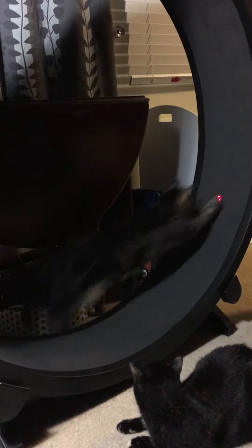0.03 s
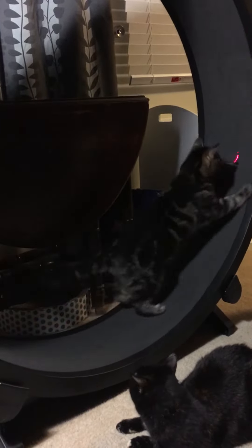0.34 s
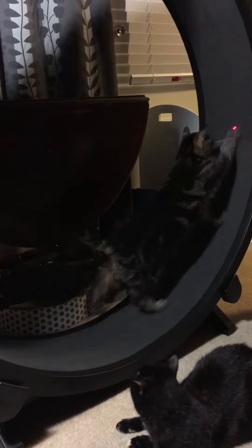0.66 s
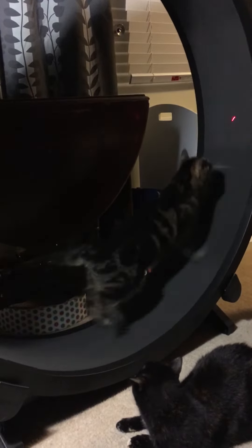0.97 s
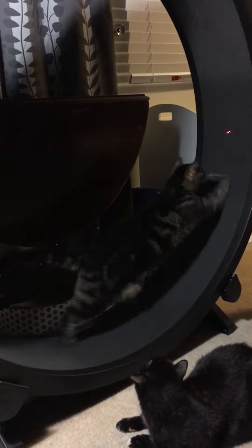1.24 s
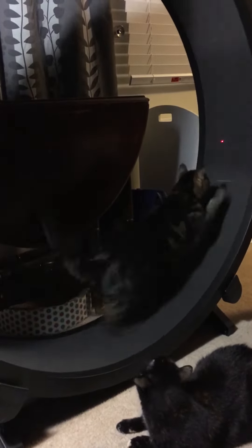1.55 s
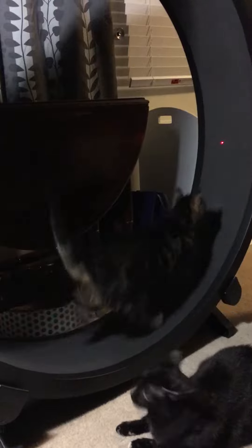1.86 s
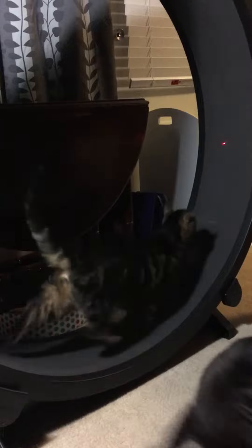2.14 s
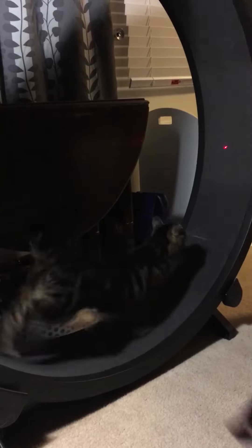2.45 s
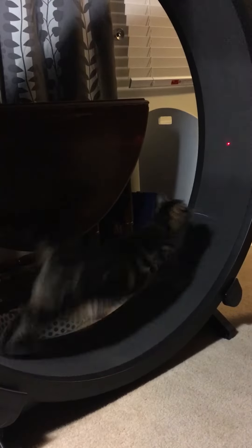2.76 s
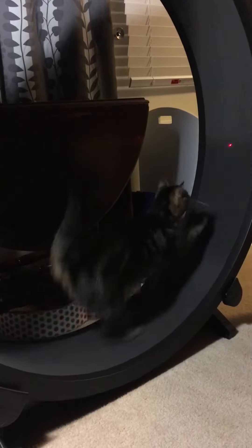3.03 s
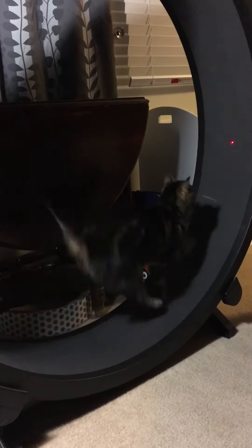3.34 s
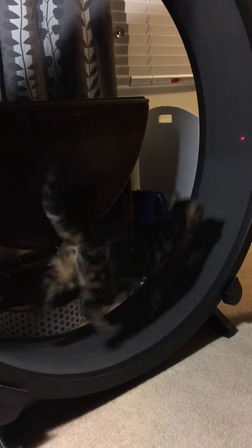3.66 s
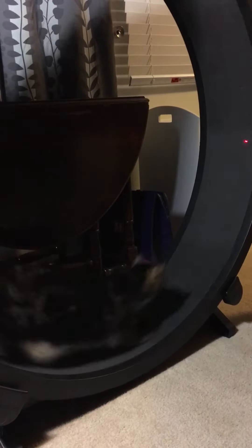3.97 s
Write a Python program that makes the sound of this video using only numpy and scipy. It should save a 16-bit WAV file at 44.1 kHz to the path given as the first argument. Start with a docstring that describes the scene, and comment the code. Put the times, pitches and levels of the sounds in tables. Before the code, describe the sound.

Hollow paw thumps and claw ticks as a cat runs in a rumbling exercise wheel.

```python
"""Paw thumps, sparse at first, then a steady gallop: a cat in a large plastic exercise wheel.
Each paw swells the wheel's hollow ring into a thump. The rim clacks on its rollers; claws tick,
squeak and snag in the tread. Underneath, the rollers rumble as the wheel gathers speed and paws
scuff the lining. The room is quiet and carpeted."""
import sys
import numpy as np
from scipy import signal
from scipy.io import wavfile
from scipy.ndimage import map_coordinates

SR = 44100
rng = np.random.default_rng(int(sys.argv[2]) if len(sys.argv) > 2 else 0)


def digitize_waveform(pressure):
    """Quantize a signal to 16-bit integers and store it at the path in sys.argv[1].

    Rows of a 2-D input are taken as channels; values are limited to [-1, 1].
    """
    field = np.atleast_2d(pressure).T
    bounded = np.clip(field, -1, 1)
    quanta = np.round(bounded * 32767).astype(np.int16)
    wavfile.write(sys.argv[1], SR, quanta)


N = 176400
T = np.arange(N) / SR

# room air spectrum: f/Hz, level/dB
AIR_SPECTRUM = [(25,-32),(60,3),(180,-1.5),(450,-11.5),(1600,-19.5),(16000,-41.5)]
# room decay: f/Hz, t60/s
ROOM_DECAY = [(100,0.71),(500,0.2),(2000,0.18),(8000,0.17),(16000,0.12)]
# rolling envelope: t/s, level/dB
ROLL_ENVELOPE = [(0,-54),(.45,-53),(.7,-41),(1.1,-34.5),(1.6,-31),(2.3,-30.5),(3.3,-31.5),(4,-32)]
# roller rumble spectrum: f/Hz, level/dB
RUMBLE_SPECTRUM = [(25,-30),(55,-14.5),(140,-6.5),(220,-5),(300,1.5),(450,-11.5),(560,-20),(1000,-29),(3200,-37.5),(4200,-43),(16000,-50)]
# paws brush the lining: centre t/s, level/dB
SCUFFS = [(.19,-58),(.91,-56.5),(1.2,-67),(1.62,-56.5),(1.75,-54.5),(1.87,-54.5),(2.1,-56.5),(2.27,-51.5),(2.42,-55),(2.59,-55),(2.798,-54.5),(2.925,-55),(3.09,-61),(3.18,-56),(3.53,-54.5),(3.748,-52.5),(3.97,-55.5)]
# lining friction spectrum: f/Hz, level/dB
SCUFF_SPECTRUM = [(1800,7.5),(4500,2.5),(6500,4),(10500,-4),(14000,5),(16000,-7.5)]
# claws slip: t/s, level/dB, f/Hz
CLAW_SLIPS = [(0.192,-57,1650),(.907,-50,1550),(1.022,-54.5,1900),(1.509,-43.5,1700),(1.821,-52,1960),(1.891,-47.5,1840),(2.222,-51,1780),(3.682,-46.5,1900)]
# claw tips tap: t/s, level/dB
CLAW_TAPS = [(.358,-37.5),(.517,-41.5),(1.023,-39),(1.305,-37),(1.386,-35),(1.493,-43),(1.957,-35.5),(2.158,-33.5),(2.4213,-31.5),(2.692,-33.5),(2.783,-35),(2.974,-35.5),(3.274,-35),(3.41,-36.5),(3.469,-37)]
# claws snag, one snaps free loudly: t/s, level/dB
CLAW_SNAGS = [(0.1342,-18),(.2665,-20.5),(0.3145,-17.5),(0.5521,-17),(0.5594,-3),(0.7497,-19.5),(0.761,-16),(0.811,-19.5),(0.8201,-18),(1.0876,-22.5),(1.097,-19.5),(1.132,-25),(1.463,-18),(1.511,-15.5),(1.7416,-20),(1.8882,-20.5),(2.0407,-12),(2.1885,-28),(2.22,-20),(2.4804,-13),(2.489,-9),(2.5591,-12),(2.629,-13),(3.0959,-37)]
# tap and snag spectrum: f/Hz, level/dB
CLAW_SPECTRUM = [(400,-1.5),(1500,6.5),(4600,3),(6000,5),(10500,1),(13000,3.5),(16000,6)]
# rim knocks on the rollers: t/s, level/dB
RIM_KNOCKS = [(.113,-40),(.217,-33),(0.244,-28.5),(.5565,-33),(0.75,-32.5),(.8105,-31),(1.086,-32),(1.5907,-30),(1.739,-28),(2.037,-28),(2.183,-15.5),(2.2508,-33),(2.269,-29),(2.332,-29),(2.49,-27.5),(2.628,-27),(2.781,-30),(2.938,-30),(3.0925,-20.5),(3.1882,-29),(3.539,-30),(3.562,-13)]
# clack and rattle spectrum: f/Hz, level/dB
PLASTIC_SPECTRUM = [(200,-41),(600,5),(1200,0.5),(1950,6),(2600,-0.5),(3250,1),(4200,-15),(6500,-15.5),(16000,-18)]
# leading paw lands: t/s, level/dB
LANDINGS = [(.115,-25.5),(0.214,-26),(.241,-22.5),(0.314,-29.5),(.501,-29.5),(0.752,-18),(.809,-21.5),(.982,-29),(1.044,-17),(1.25,-16),(1.419,-20.5),(1.514,-20.5),(1.586,-16),(1.66,-22),(1.742,-21.5),(1.815,-21),(1.892,-16),(2.044,-14.5),(2.186,-13),(2.332,-17.5),(2.486,-15),(2.628,-14),(2.782,-15.5),(2.944,-15),(3.093,-18),(3.252,-18),(3.413,-15),(3.561,-12.5),(3.720,-15),(3.883,-21)]
# pad slap spectrum: f/Hz, level/dB
SLAP_SPECTRUM = [(60,-25.5),(130,-5.5),(250,-3.5),(420,7.5),(560,-8.5),(1300,-17),(2200,-33),(6000,-40)]
# wheel shell modes: f/Hz, level/dB, t60/s
SHELL_MODES = [(183.7,-8,0.46),(281.5,0.5,0.23),(387.6,8,0.056)]

RING_HZ, RING_PEAK_S, DETUNE, WOBBLE = 294.7, 0.013, 0.021, 0.06
BODY_DB, SHELL_DB = -15, -5.5
HARD_DB, BODY_DB_PER_DB = -15, 0.53  # landings below HARD_DB ring less
SLAP_DB, SLAP_RISE_S, SLAP_DECAY_S = -21.5, 0.0045, 0.019
PARTNER_LAG_S, PARTNER_DB = .047, -10.5  # second paw of each pair


def amp(db):
    """dB to gain."""
    return 10 ** (np.asarray(db) / 20)


def unit(x):
    """Scale to rms 1."""
    return x / np.sqrt(np.mean(x ** 2) + 1e-20)


def read(points, hz):
    """Interpolate over log frequency."""
    f, value = np.transpose(points)
    return np.interp(np.log(hz + 1), np.log(f + 1), value)


def add(mix, at_s, sound):
    """Mix in at at_s."""
    part = mix[max(round(at_s * SR), 0):][:len(sound)]
    part += sound[:len(part)]


def colour(x, spectrum, size=4096):
    """Causal unit-energy filter of the given spectral shape."""
    log_gain = np.log(amp(read(spectrum, abs(np.fft.fftfreq(size, 1 / SR)))))
    taps = np.fft.ifft(np.exp(np.conj(signal.hilbert(log_gain)))).real[:size // 2]
    return signal.oaconvolve(x, taps / np.linalg.norm(taps))[:N]


def drift(rate_hz, count):
    """Smooth random curve, rms about 1."""
    at = np.arange(count) / SR * rate_hz
    return map_coordinates(rng.standard_normal(int(at[-1]) + 4), [at + 1], order=3, mode="nearest")


def crackle(count, grain):
    """Noise in sub-millisecond clumps."""
    return unit(rng.standard_normal(count) * np.exp(grain * np.tanh(drift(1440, count))))


def grains(per_s, decay_s, count, spread_db=2):
    """Decaying noise bursts, random in time and size."""
    hits = rng.random(N) < per_s / SR
    sizes = amp(spread_db * np.minimum(rng.exponential(1, N), 3))
    envelope = signal.oaconvolve(hits * sizes, np.exp(-T[:count] / decay_s))[:N]
    return envelope * rng.standard_normal(N)


def air(level_db=-45.5):
    """Steady low room noise."""
    return amp(level_db) * unit(colour(rng.standard_normal(N), AIR_SPECTRUM))


def room(x, gap_s=.004, density=.1, size=20000):
    """Sparse reflections; each band decays at its own rate."""
    taps = rng.standard_normal(size) * (rng.random(size) < density) * (T[:size] > gap_s)
    hz, t, bands = signal.stft(taps, SR, nperseg=256)
    decay = amp(-60 * t / read(ROOM_DECAY, hz)[:, None])
    tail = signal.istft(bands * decay, SR, nperseg=256)[1]
    return signal.oaconvolve(x, tail / np.linalg.norm(tail))[:N]


def rolling(lumpy_db=2.0, rattle_db=-21.5):
    """The wheel rumbles over its rollers, with small plastic rattles."""
    rumble = colour(rng.standard_normal(N) * amp(lumpy_db * drift(45, N)), RUMBLE_SPECTRUM)
    rattle = colour(grains(per_s=140, decay_s=.004, count=900), PLASTIC_SPECTRUM)
    envelope = amp(np.interp(T, *np.transpose(ROLL_ENVELOPE)))
    return envelope * (unit(rumble) + amp(rattle_db) * unit(rattle))


def scuffing(width_s=.045, hiss_db=3.5, flutter_db=1.5, grit_db=2.5):
    """Gritty hiss swells as a paw brushes the lining."""
    swells = sum(amp(db) * np.exp(-((T - at_s) / width_s) ** 2) for at_s, db in SCUFFS)
    hiss = amp(hiss_db + flutter_db * drift(50, N)) * rng.standard_normal(N)
    grit = amp(grit_db) * unit(grains(per_s=190, decay_s=.00041, count=400))
    return swells * colour(hiss + grit, SCUFF_SPECTRUM)


def squeaks(peak_s=.0047, width_hz=480, count=4000):
    """Slipping claws scrape out short narrow-band squeaks."""
    out, u = np.zeros(N), T[:count] / peak_s
    for at_s, db, hz in CLAW_SLIPS:
        band = signal.butter(2, [hz - width_hz / 2, hz + width_hz / 2], "bandpass", fs=SR)
        scrape = signal.lfilter(*band, rng.standard_normal(count))
        add(out, at_s, amp(db) * unit(u * np.exp(-u) * scrape))
    return out


def claw_catch(decay_s, tick=5.55, count=2000):
    """Sharp tick, then a short tearing of fibres."""
    burst = np.exp(-T[:count] / decay_s) * crackle(count, grain=.75)
    burst[0] = tick
    return burst


def claws(snag_db=-15):
    """Claws snag in the tread or only tap it."""
    out = np.zeros(N)
    for at_s, db in CLAW_SNAGS:
        add(out, at_s, amp(db + snag_db) * claw_catch(decay_s=.004))
    for at_s, db in CLAW_TAPS:
        add(out, at_s, amp(db) * claw_catch(decay_s=.0016))
    return colour(out, CLAW_SPECTRUM)


def clacks(gain_db=-20.5, rise_s=.0064, decay_s=.0059, count=4000):
    """The plastic rim chatters briefly against a roller."""
    out, t = np.zeros(N), T[:count]
    envelope = np.minimum(t / rise_s, 1) ** 2 * np.exp(-t / decay_s)
    for at_s, db in RIM_KNOCKS:
        chatter = colour(envelope * crackle(count, grain=.8), PLASTIC_SPECTRUM)
        add(out, at_s, amp(db + gain_db) * unit(chatter))
    return out


def shell_hum(t):
    """Damped shell modes, detuned anew at each landing."""
    hum = np.zeros(len(t))
    for hz, db, t60_s in SHELL_MODES:
        detuned_hz = hz * (1 + DETUNE * rng.standard_normal())
        hum += amp(db - 60 * t / t60_s) * np.sin(2 * np.pi * (detuned_hz * t + rng.random()))
    return hum


def paws(count=8000):
    """Each soft pad slaps the tread, swells the wheel's main ring and leaves the shell humming."""
    out, t = np.zeros(N), T[:count]
    u = t / RING_PEAK_S
    slap_envelope = np.minimum(t / SLAP_RISE_S, 1) * np.exp(-np.maximum(t - SLAP_RISE_S, 0) / SLAP_DECAY_S)
    partners = [(at_s + PARTNER_LAG_S, db + PARTNER_DB) for at_s, db in LANDINGS]
    for at_s, db in LANDINGS + partners:
        hz = RING_HZ * (1 + DETUNE * rng.standard_normal() + WOBBLE * drift(144, count))
        ring = (u * np.exp(1 - u)) ** 2 * np.sin(2 * np.pi * np.cumsum(hz) / SR)
        shell = amp(SHELL_DB) * np.minimum(u / 2, 1) ** 2 * shell_hum(t)
        body_db = db + BODY_DB + BODY_DB_PER_DB * (db - HARD_DB)
        add(out, at_s, amp(body_db) * unit(ring + shell))
        slap = colour(slap_envelope * rng.standard_normal(count), SLAP_SPECTRUM)
        add(out, at_s, amp(db + SLAP_DB) * unit(slap))
    return out


def scene(thump_send_db=-15, click_send_db=-9.5):
    """Cat, wheel and room; mono."""
    thumps = paws()
    clicks = clacks() + claws() + squeaks()
    background = air()
    reverb = room(amp(thump_send_db) * thumps + amp(click_send_db) * clicks)
    return (background + reverb + rolling() + scuffing() + clicks + thumps)[None]


def record(dry):
    """Low-pass at 16.2 kHz."""
    taps = signal.firwin(255, 16200, window=("kaiser", 9), fs=SR)
    return signal.oaconvolve(dry, taps[None], "same")


dry = scene()
out = record(dry)
digitize_waveform(out)
```